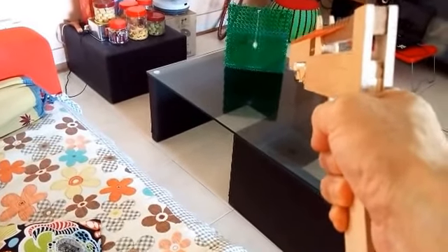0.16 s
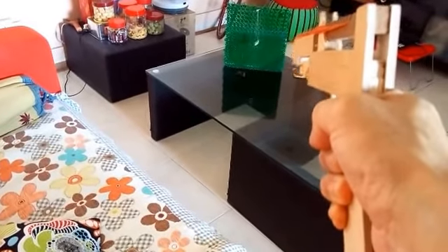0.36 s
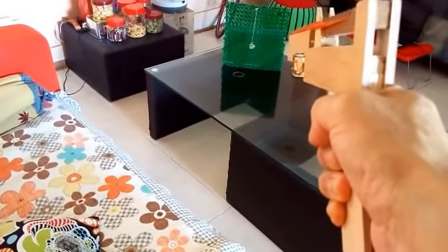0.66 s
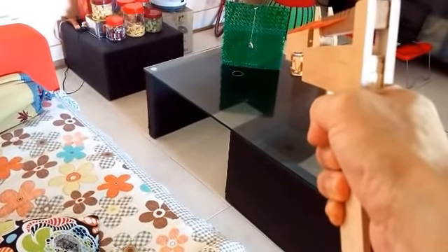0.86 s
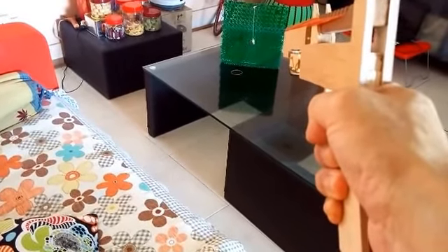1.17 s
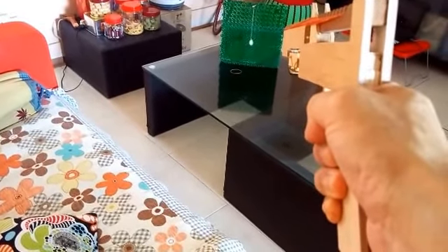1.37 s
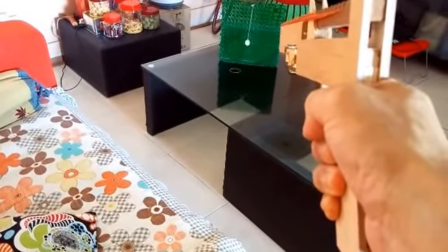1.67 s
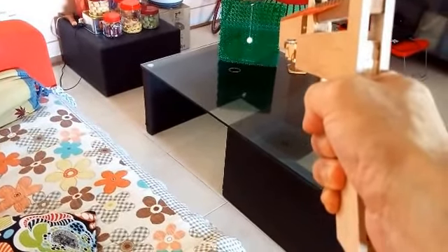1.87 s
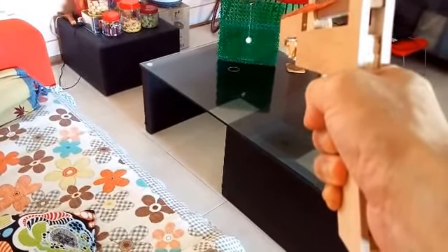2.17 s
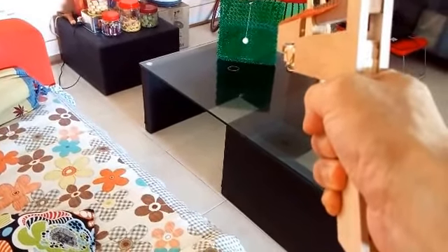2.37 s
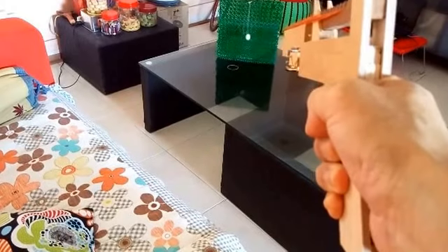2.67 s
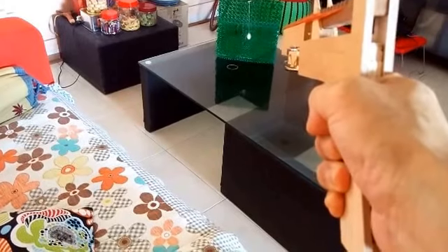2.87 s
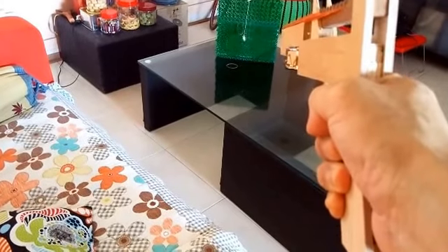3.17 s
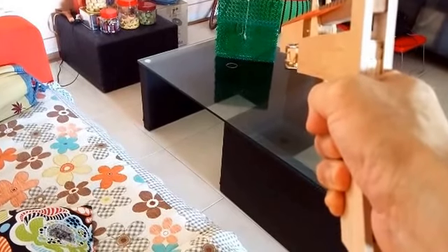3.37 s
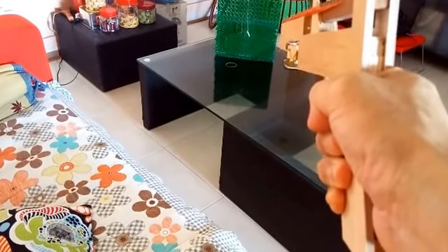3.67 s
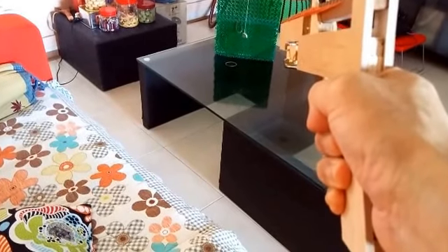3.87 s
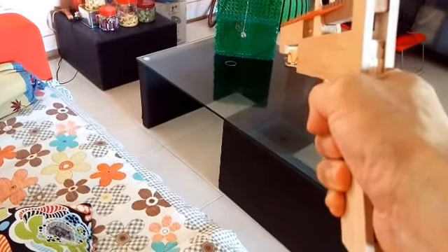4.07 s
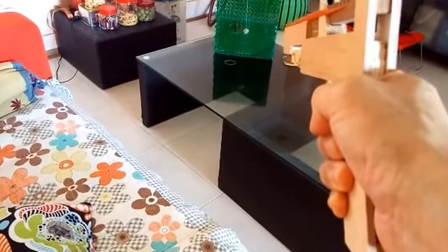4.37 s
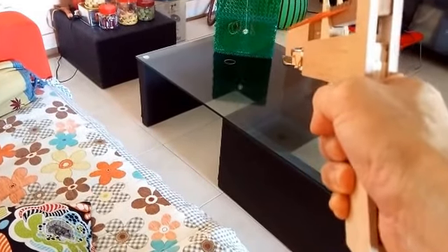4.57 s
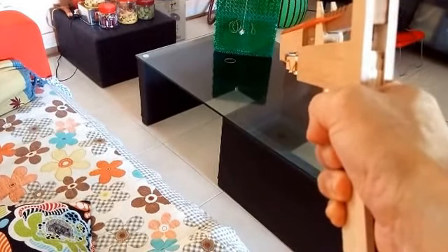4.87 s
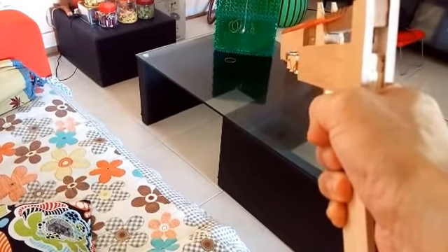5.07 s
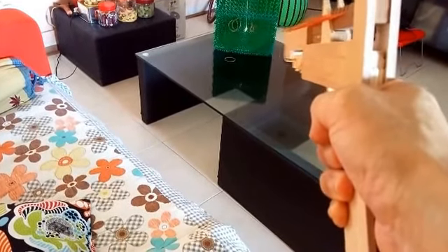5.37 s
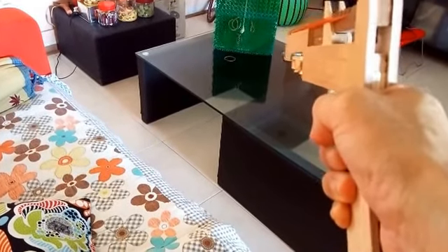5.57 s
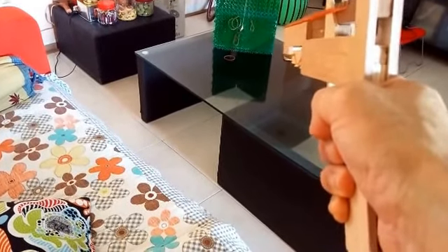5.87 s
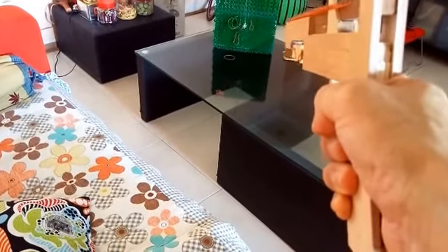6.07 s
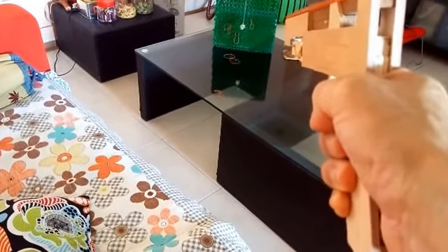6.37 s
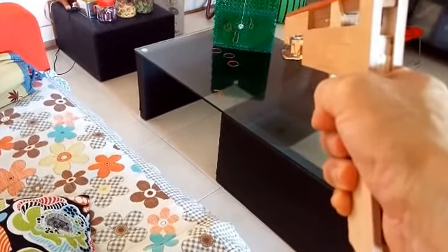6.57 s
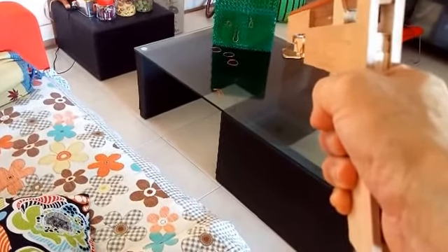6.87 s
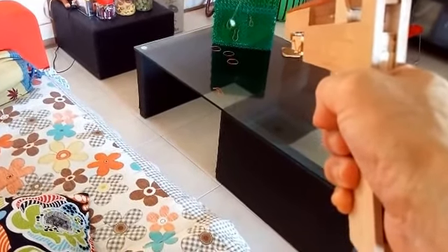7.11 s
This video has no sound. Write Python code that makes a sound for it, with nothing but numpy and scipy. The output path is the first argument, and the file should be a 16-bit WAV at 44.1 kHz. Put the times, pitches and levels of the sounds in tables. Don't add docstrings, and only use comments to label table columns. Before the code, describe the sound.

A wooden rubber band gun fires eight shots close by, sharp snaps and wooden clacks, bands slapping a hollow box, the last chiming a small bell.

```python
import sys
import numpy as np
from scipy import signal
from scipy.fft import rfft, irfft, next_fast_len
from scipy.io import wavfile
from scipy.ndimage import uniform_filter1d, map_coordinates

SR = 44100
rng = np.random.default_rng(int(sys.argv[2]) if len(sys.argv) > 2 else 0)


def volts_from_db(level):
    exponent = np.asarray(level, float) / 20
    return 10 ** exponent


def output_pcm(signal):
    pcm = np.clip(np.atleast_2d(signal).T, -1, 1) * 32767
    wavfile.write(sys.argv[1], SR, np.round(pcm).astype(np.int16))


N = 319284

# start_s, peak_db, treble_db, bounce_db
RELEASES = [
    (0.2697, -19, -8.5, -6.5),
    (2.5703, -12, -12, 11),
    (4.138, -16.5, -4, -3),
    (4.5505, -12.5, -4, 7),
    (5.4936, -12.5, -5.5, -13),
    (5.921, -10, -6, 0),
    (6.3631, -9.5, -12, -9),
    (6.8295, -7, -9.5, -6.5),
]
# pitch_hz, width_hz, level_db
RELEASE_FRAME = [(1500, 123, 5.5), (2600, 2100, -2), (4620, 1070, -2.5), (5900, 830, -1.5), (8100, 870, -8)]
# pitch_hz, level_db
RELEASE_TAIL = [(530, -7.5), (900, -10), (1290, -9.5), (1500, -7), (2170, -0.5), (6500, -6), (15500, -15)]


def releases(out):
    frame_blows(out, RELEASES, RELEASE_FRAME, RELEASE_TAIL, blow_t60=0.0046, rise_s=0.00033, spike=0.36,
                crack_db=2.0, wet_db=-1.5, pan_db=7.0, bounce_s=0.0019)


# start_s, peak_db, treble_db, bounce_db
SNAPS = [
    (0.5899, -4.5, -4, 2.5),
    (2.8043, -4, -18, -2.5),
    (4.3528, -6, -7, 3.5),
    (4.7349, -4, -7, 10),
    (5.735, -3.5, -21, -3),
    (6.1233, -2, -14, -8),
    (6.5719, -1.5, -4, 11),
    (7.0259, -3.5, -5, 3),
]
# pitch_hz, width_hz, level_db
SNAP_FRAME = [(783, 470, -10.5), (1490, 215, 0.5), (2157, 530, 3), (3140, 470, -0.5), (4030, 780, -2.5),
              (7340, 1580, -7.5)]
# pitch_hz, level_db
SNAP_TAIL = [(530, -30), (900, -8.5), (1230, -16), (1520, -2), (3890, -0.5), (10300, -11.5), (15000, -25),
             (15500, -50)]


def snaps(out):
    frame_blows(out, SNAPS, SNAP_FRAME, SNAP_TAIL, blow_t60=0.016, rise_s=0.000076, spike=5.43,
                crack_db=-8.0, wet_db=-6.5, pan_db=2.5, bounce_s=0.0021)


# start_s, peak_db
TICKS = [(0.556, -40), (2.557, -37), (2.7626, -27.5), (4.323, -24), (4.5101, -21), (5.438, -27),
         (5.7059, -23.5), (5.866, -22), (6.0825, -17), (6.3182, -26), (6.5327, -27.5), (6.7843, -20.5),
         (6.991, -24.5)]
# pitch_hz, width_hz, level_db
TICK_FRAME = [(1574, 260, 4.5), (2450, 400, 3), (3260, 710, 1.5), (4900, 2100, -10)]


def ticks(out):
    treble_db, bounce_db = -9, -2.5
    rows = [(start_s, peak_db, treble_db, bounce_db) for start_s, peak_db in TICKS]
    frame_blows(out, rows, TICK_FRAME, SNAP_TAIL, blow_t60=0.015, rise_s=0.00048, spike=0.4,
                crack_db=-18, wet_db=-5.5, pan_db=11.0, bounce_s=0.0021)


def frame_blows(out, rows, frame, tone, blow_t60, rise_s, spike, crack_db, wet_db, pan_db, bounce_s):
    t = np.arange(SR // 30) / SR
    for start_s, peak_db, treble_db, bounce_db in rows:
        noise = rng.standard_normal(len(t)) + 1.28 * rng.standard_normal((2, len(t)))
        noise[:, 8] += spike * np.array([1.5, 3])
        blow = (1 - np.exp(-t / rise_s)) * fading(t, blow_t60)
        bounce = volts_from_db(bounce_db) * fading(t - bounce_s, 1.56 * blow_t60)
        share = volts_from_db(rng.normal(0, 1.93, (len(frame), 2, 1)))

        def wood(f):
            total = 0
            for k, (hz, width, db) in enumerate(frame):
                mode = 1j * f * width / (hz * hz - f * f + 1j * f * width)
                total = total + (-1) ** k * share[k] * volts_from_db(db) * mode
            return total

        def treble(f):
            return (1j * f / 6000 / (1 + 1j * f / 6000)) ** 2

        ring = filtered((blow + bounce) * noise, wood)
        crack = filtered(fading(t, 3.7 * blow_t60) * noise, treble)
        ring = ring / np.abs(ring).max()
        crack = volts_from_db(min(treble_db, -4) + crack_db) * crack / np.abs(crack).max()
        lean = volts_from_db(np.array([[pan_db / 2], [-pan_db / 2]]))
        click = lean * ring + crack / lean ** 0.43
        add(out, start_s - 0.0002, click * volts_from_db(peak_db + 5), wet_db, tone)


# start_s, slap_db, boom_db, boom_pitch_hz, knock_db
LANDINGS = [
    (0.3338, -13.5, -21.5, 364, -23.5),
    (2.6305, -12, -22.5, 399, -22),
    (4.1977, -12, -23, 298, -21),
    (4.6084, -11.5, -25, 350.4, -22),
    (5.5511, -10.5, -12, 391.8, -25),
    (5.9751, -9.5, -10, 399.7, -20),
    (6.4097, -8, -17.5, 308.4, -18.5),
    (6.8995, -22, -21.5, 327, -37),
    (.412, -37, -44, 339, -44),
    (4.662, -23, -32.5, 584, -40),
]
# pitch_ratio, level_db
WALL_MODES = [(.5, -21), (0.818, -5.5), (0.922, -5.5), (1.62, -20)]
# pitch_hz, level_db
SLAP_TAIL = [(590, -17), (1000, -31), (1100, -3), (1680, 2), (5850, 3.5), (14500, -2.5), (15500, -2)]


def box(out):
    t = np.arange(SR // 3) / SR
    boom_t60, ring_db, ring_t60 = 0.063, -18, 0.17

    def face(f):
        return f / (f + 1200) + 1.2j * f * 1200 / (2800 ** 2 - f * f + 1j * f * 1200)

    def card(f):
        return 1j * f * 550 / (560 ** 2 - f * f + 1j * f * 550)

    for start_s, slap_db, boom_db, hz, knock_db in LANDINGS:
        slap = fading(t, 0.013) * filtered(rng.standard_normal((2, len(t))), face)
        slap = slap * (1 + 1.3 * fading(t, 0.0089))
        add(out, start_s, volts_from_db(slap_db - 9) * slap, 2.5, SLAP_TAIL)

        main_decay = fading(t, boom_t60) + volts_from_db(ring_db) * fading(t, ring_t60)
        boom = main_decay * np.sin(2 * np.pi * hz * t)
        for ratio, db in WALL_MODES:
            level = volts_from_db(db + rng.normal(0, 0.93))
            boom = boom + level * fading(t, 1.35 * boom_t60) * np.sin(2 * np.pi * ratio * hz * t)
        knock = filtered(filtered(rng.standard_normal(len(t)), card), card)
        knock = unit(knock) * fading(t, 0.12)
        thump = volts_from_db(boom_db + 10.5) * boom + volts_from_db(knock_db - 3.0) * knock
        thump = thump * (1 - np.exp(-(t / 0.0077) ** 2))
        add(out, start_s + 0.00215, thump * volts_from_db([[0.5], [-0.5]]), wet_db=1.5)


# pitch_hz, level_db, t60_s
BELL_MODES = [(4306, -8, .3), (4330, -6, .4), (4358, 1, .6), (4386, -2, .5), (7530, -7, .25),
              (8170, -8, .2), (8255, -2, .35), (8296, 0, .4), (8340, -5, .25), (12190, -7, .25),
              (12283, -6, .3), (12700, -9, .18), (13310, -9, .2), (14800, -7, .2)]
# pitch_hz, level_db, t60_s
GRAZE_MODES = [
    (13400, -28, .08),
    (14950, -36, 0.21),
]


def bell(out):
    t = np.arange(SR * 2 // 5) / SR
    strike_s, strike_db = 6.8775, -14.5
    hiss = filtered(rng.standard_normal((2, len(t))), lambda f: (f / (f + 4000)) ** 2)
    rattle = hiss * (volts_from_db(-16) * fading(t, 0.018) + volts_from_db(3.5) * fading(t, 0.31))
    add(out, strike_s, volts_from_db(strike_db) * (chime(BELL_MODES, t, shiver=74) + rattle), wet_db=3.0)
    add(out, LANDINGS[0][0] - 0.003, chime(GRAZE_MODES, t, shiver=120), wet_db=0)


def chime(modes, t, shiver):
    total = 0
    for hz, db, t60 in modes:
        drift = np.cumsum(rng.standard_normal((2, len(t))), axis=1) * np.sqrt(shiver / SR)
        phase = 2 * np.pi * hz * t + np.sqrt(hz / 4000) * drift
        total = total + volts_from_db(db) * fading(t, t60) * np.sin(phase)
    return total


# start_s, level_db
DRAUGHT = [(0, -45.5), (.3, -49), (.8, -46), (.9, -61), (1.0, -39), (1.7, -50), (2.0, -45.5), (2.7, -41.5),
           (3.1, -47.5), (3.7, -45.5), (3.99, -46.5), (4.15, -37), (5.0, -35.5), (5.35, -48), (5.5, -27.5),
           (6.25, -42.5), (7.1, -28.5), (7.24, -34.5)]
# start_s, peak_db
SWELLS = [(0.192, -30.5), (.34, -36), (.45, -33), (.6, -34), (.73, -36), (.82, -40), (1.18, -52),
          (1.45, -44), (1.8, -41), (1.88, -44), (2.18, -44), (2.44, -46), (3.06, -52), (3.56, -42),
          (3.78, -35), (3.909, -38.5), (4.08, -33), (4.49, -31.5), (6.38, -35)]
# start_s, peak_db, length_s, left_right_db
GUSTS = [(4.672, -21.5, 0.036, -11), (4.75, -25, 0.053, -18), (4.849, -6.5, 0.053, -41),
         (4.949, -18.5, 0.053, 15), (5.011, -24, 0.074, 5), (5.155, -29, 0.074, -2.5),
         (5.282, -35, 0.043, -3.5), (5.392, -28, 0.035, -12), (5.477, -34, .06, -5),
         (5.667, -28, 0.13, -19), (6.498, -24.5, 0.11, -5), (6.62, -25.5, 0.081, -23),
         (6.709, -21, 0.039, -9), (6.78, -29, .03, -18), (6.937, -14, 0.047, -28), (6.989, -13, 0.023, -10),
         (7.12, -23.5, 0.064, -11)]
# pitch_hz, level_db (per Hz)
BUFFET = [(15, -43), (25, -105), (45, 18), (89, 6), (230, -40.5), (300, -21.5), (390, -50), (660, -120)]
# pitch_hz, level_db (per Hz)
GUST_TONE = [(20, -35), (45, 0), (65, 1), (95, -0.5), (150, -15), (250, -32), (400, -44), (660, -120)]


def draught():
    t = np.arange(N) / SR

    def puff(start_s, length_s):
        return np.exp(-((t - start_s) / length_s) ** 2 * 2.1)

    flutter_db = 4 * wobble(14)
    strength = volts_from_db(np.interp(t, *np.transpose(DRAUGHT)) + flutter_db)
    for start_s, peak_db in SWELLS:
        strength = strength + volts_from_db(peak_db) * puff(start_s, 0.037)
    push = 0
    for start_s, peak_db, length_s, pan_db in GUSTS:
        shade_db = np.minimum(0, np.array([[pan_db], [-pan_db]]))
        push = push + volts_from_db(peak_db + shade_db) * puff(start_s, length_s)
    rumble = strength * steady(rush(BUFFET, [(50, 0.98)]), slack=0.29)
    gusts = push * steady(rush(GUST_TONE, [(50, 0.083)]), slack=0.05)
    return rumble + gusts


def steady(x, slack):
    return unit(x / np.sqrt(np.abs(uniform_filter1d(x ** 2, size=SR // 30)) + slack))


# start_s, pitch_hz, level_db
SQUEAKS = [
    [(.95, 3800, -70), (1.3, 3800, -71), (1.55, 4150, -71), (1.75, 4200, -71), (1.9, 3800, -69),
     (2.2, 4000, -73)],
    [(3.3, 3990, -73), (3.5, 3800, -70), (3.78, 3960, -71), (4.05, 3760, -73)],
]


def bearing():
    t, out = np.arange(N) / SR, np.zeros((2, N))
    for rows in SQUEAKS:
        s, hz, db = np.transpose(rows)
        breath_hz = 70 * np.array([wobble(300), wobble(300)])
        turns = np.cumsum(np.interp(t, s, hz) + breath_hz, axis=1) / SR
        fade = np.clip(np.minimum(t - s[0], s[-1] - t) / 0.08, 0, 1)
        out += fade * volts_from_db(np.interp(t, s, db) + 5.0) * np.sin(2 * np.pi * turns)
    return out


# pitch_hz, level_db (per Hz)
HISS = [(71, -31.5), (120, -1.5), (190, -5), (684, -16.5), (1500, -21.5), (11500, -32.5), (15800, -33.5),
        (16000, -60)]
# pitch_hz, left_right_likeness
ALIKE = [(60, 0.78), (240, 0.96), (950, -0.14), (3770, 0.011), (15000, -0.17)]


def room(loud):
    t = np.arange(N) / SR
    whine = np.sin(2 * np.pi * (14424 * t + 0.04 * wobble(20) + np.array([[0], [0.2]])))
    hum = np.sin(2 * np.pi * (732 * t + 0.1 * wobble(10)))
    hiss = volts_from_db(18.5 + 1.7 * wobble(7.6)) * rush(HISS, ALIKE)
    floor = hiss + volts_from_db(9.0) * whine + volts_from_db(4.5) * hum

    open_db, knee_db = -57.5, -28
    slope, listen_s = 0.57, 0.05
    span = max(round(listen_s * SR), 1)
    power = uniform_filter1d(loud[0] ** 2, size=span)
    power = np.abs(uniform_filter1d(power, size=span // 2 + 1))
    heard_db = 10 * np.log10(power + volts_from_db(-56) ** 2)
    return volts_from_db(open_db + slope * np.minimum(heard_db - knee_db, 0)) * floor


# pitch_hz, t60_s
ROOM = [(150, 1), (400, 1), (1500, 0.73), (4000, 0.81), (9000, 0.63), (15000, 0.29)]
# pitch_hz, level_db
ROOM_TONE = [(200, -12), (4000, -7.5), (15000, -3.5)]


def add(out, start_s, near, wet_db, tone=None):
    hz, t, z = signal.stft(rng.standard_normal((2, SR // 2)), SR, nperseg=256)
    apart = np.clip(hz / 1300, 0.4, 1)[:, None]
    z[1] = np.sqrt(1 - apart ** 2) * z[0] + apart * z[1]
    gate_db = -13 / (1 + np.exp((0.2 - t) / 0.061))
    colour_db = along(ROOM_TONE if tone is None else tone, hz)[:, None]
    decay = volts_from_db(colour_db - 60 * t / along(ROOM, hz)[:, None] + gate_db)
    build = 1 - np.exp(-(t / 0.0037) ** 2)
    tail = signal.istft(z * decay * build, SR, nperseg=256)[1]
    returns = unit(uniform_filter1d(rng.standard_normal(tail.shape), size=90))
    tail = tail * volts_from_db(2.22 * returns)
    tail = tail * np.clip(np.arange(tail.shape[1]) / (0.0022 * SR), 0, 1)
    tail = volts_from_db(wet_db) * volts_from_db([[1.3], [-1.3]]) * tail / np.linalg.norm(tail[0])
    if tone is None:
        heard = signal.fftconvolve(near, tail, axes=1)
    else:
        heard = tail * np.linalg.norm(near)
    start = round(start_s * SR)
    out[:, start:start + heard.shape[1]] += heard
    out[:, start:start + near.shape[1]] += near


def unit(x):
    return x / np.sqrt(np.mean(x ** 2) + 1e-20)


def along(points, hz):
    f, v = np.transpose(points)
    return np.interp(np.log(hz + 1), np.log(f + 1), v)


def wobble(rate):
    knots = rng.standard_normal(int(N * rate / SR) + 4)
    return map_coordinates(knots, [np.arange(N) * rate / SR])


def filtered(x, response):
    m = next_fast_len(x.shape[-1] + 8192)
    return irfft(rfft(x, m) * response(np.fft.rfftfreq(m, 1 / SR)), m)[..., :x.shape[-1]]


def rush(spectrum, alike):
    def shape(hz):
        turn = np.arccos(np.clip(along(alike, hz), -1, 1)) / 2
        return volts_from_db(along(spectrum, hz)) * [np.cos(turn), np.sin(turn)]

    mid, side = filtered(rng.standard_normal((2, N)), shape)
    return unit(np.array([mid + side, mid - side]))


def fading(t, t60):
    return (t >= 0) * volts_from_db(-60 * np.abs(t) / t60)


def scene():
    out = np.zeros((2, N + 2 * SR))
    releases(out)
    snaps(out)
    ticks(out)
    box(out)
    bell(out)
    loud = out[:, :N] + draught()
    return loud + room(loud) + bearing()


def band_limit(x):
    return signal.sosfilt(signal.butter(12, 16820, fs=SR, output="sos"), x)


def record(dry):
    top, low_hz, edge_hz = 0.9, 26, 15800

    def mic(f):
        return (1j * f / low_hz / (1 + 1j * f / low_hz)) ** 2 / np.sqrt(1 + (f / edge_hz) ** 200)

    held = dry / (1 + np.abs(dry / top) ** 6) ** (1 / 6)
    return band_limit(filtered(held, mic))


dry = scene()
out = record(dry)
output_pcm(out)
```